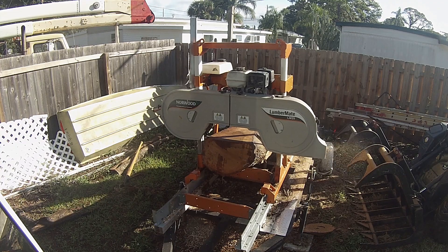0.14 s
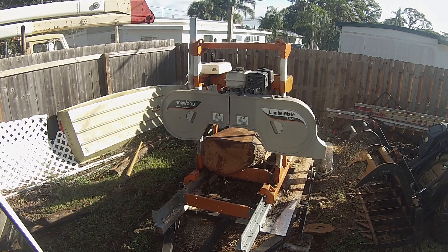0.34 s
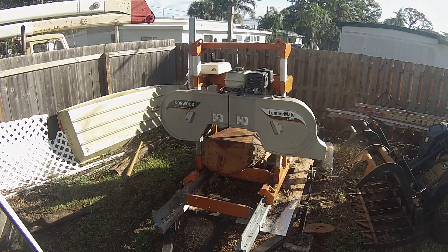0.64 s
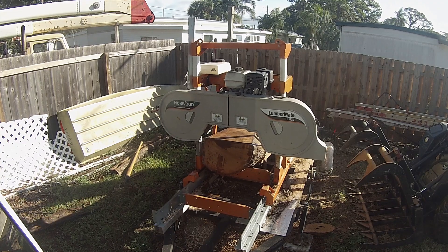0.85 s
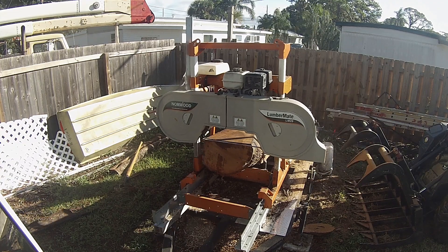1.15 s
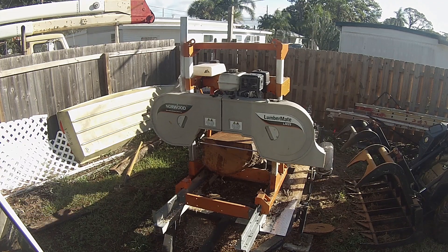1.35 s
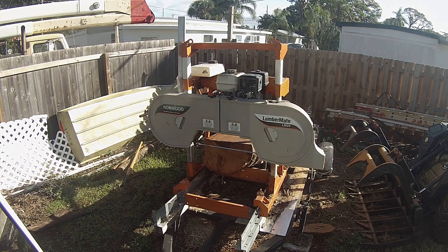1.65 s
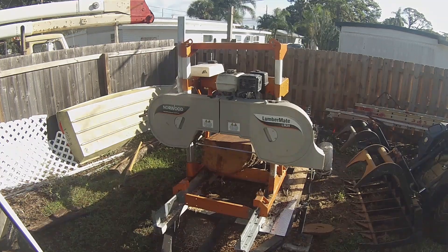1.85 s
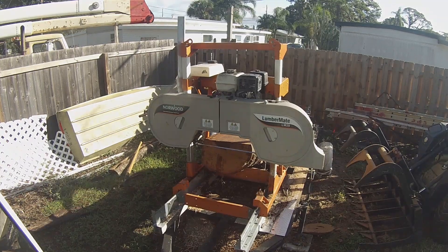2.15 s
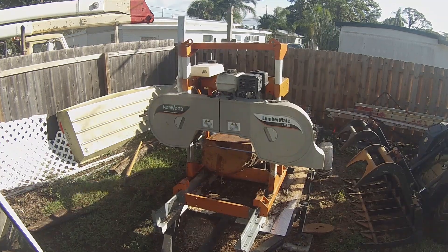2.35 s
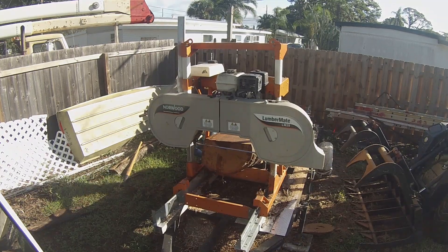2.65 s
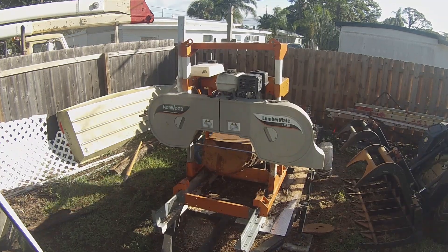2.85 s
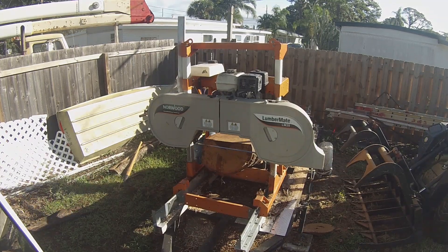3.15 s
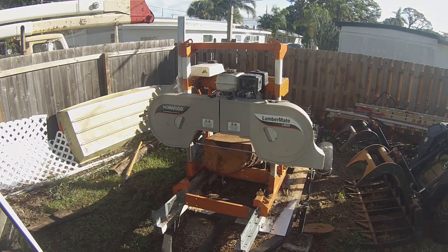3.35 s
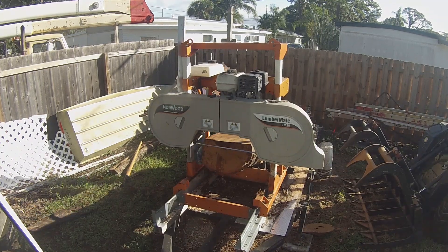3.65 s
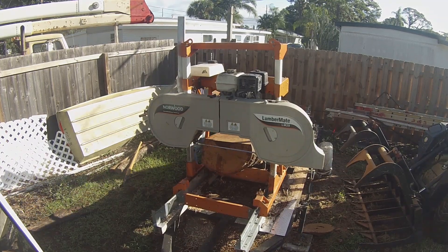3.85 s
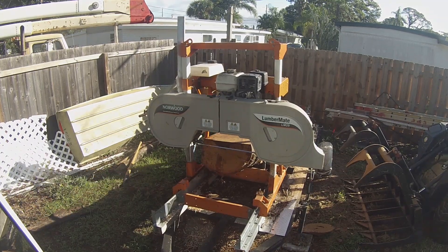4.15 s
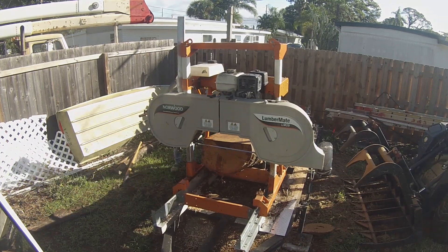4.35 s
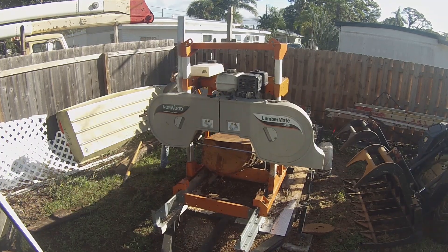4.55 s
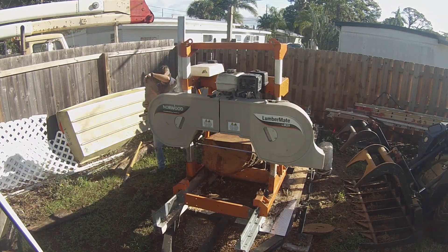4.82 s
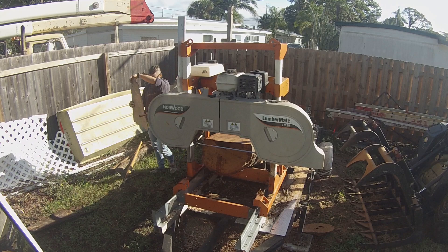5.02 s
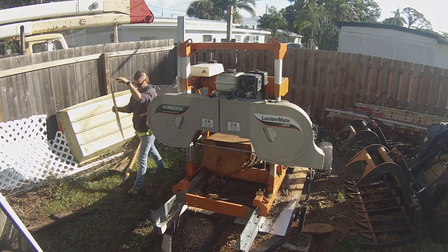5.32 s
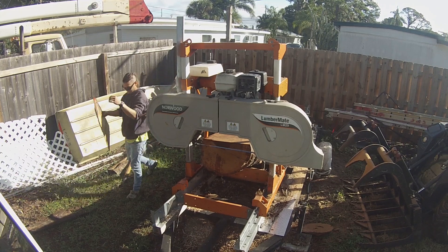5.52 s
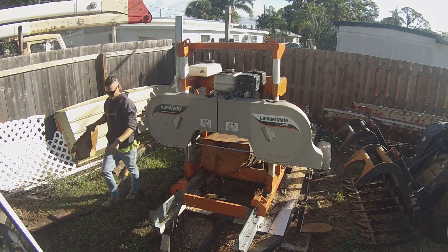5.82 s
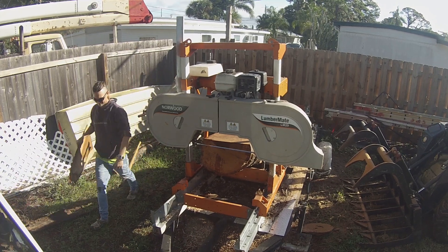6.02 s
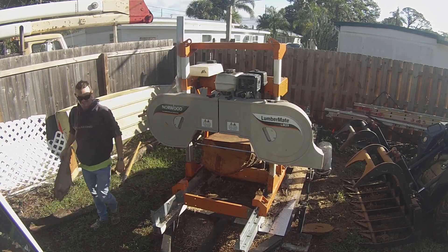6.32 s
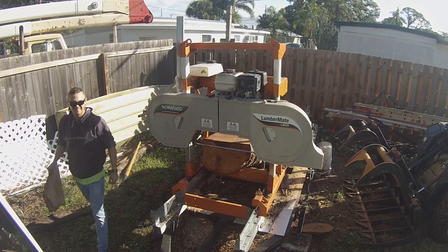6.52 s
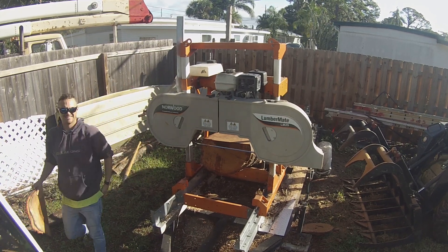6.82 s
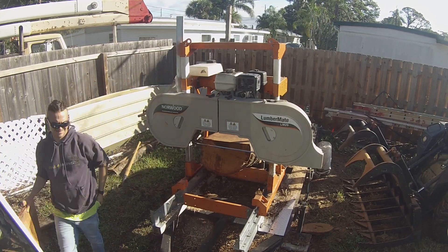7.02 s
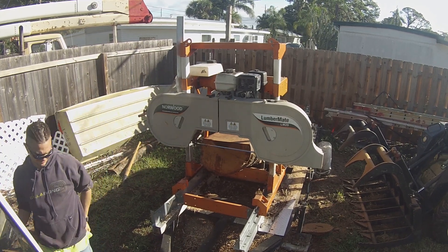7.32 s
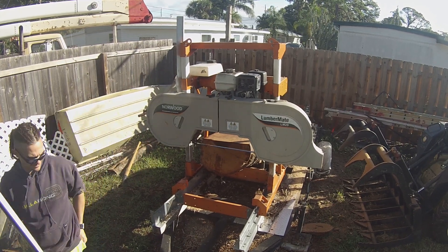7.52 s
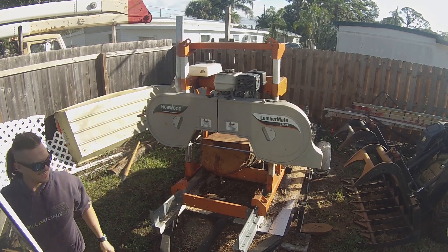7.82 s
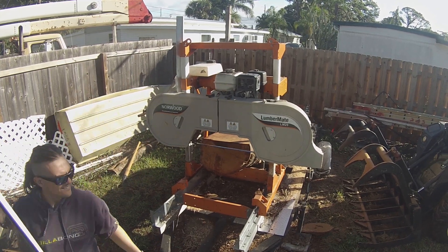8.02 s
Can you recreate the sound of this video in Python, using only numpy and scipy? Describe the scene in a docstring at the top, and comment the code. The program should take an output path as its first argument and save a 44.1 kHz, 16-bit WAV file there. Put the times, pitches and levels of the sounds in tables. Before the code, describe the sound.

A distant-sounding roar and blade hiss wind down, then at once a close small engine idles, chugging and ticking, while wind buffets the microphone.

```python
"""A single-cylinder four-stroke petrol engine drives a portable band sawmill in a fenced yard.
At first it is faint, at full throttle: crank hum, a rough roar and the hiss of the blade, until the throttle closes.
Then, abruptly, it is loud and idling: tones locked to the firing rate make exhaust thuds and singing guards;
shaped noise makes the roar of the guards, ringing covers, fan air, valve ticks, a buzz and the blade's swish.
Puffs of wind buffet the microphone as low, lumpy noise."""
import sys
import numpy as np
from scipy import signal
from scipy.fft import rfft, irfft, next_fast_len
from scipy.io import wavfile

SR = 44100
rng = np.random.default_rng(int(sys.argv[2]) if len(sys.argv) > 2 else 0)


def unload_audio(sound):
    """Save the sound as a 16-bit wav file, at the path given as the first command line argument."""
    columns = np.transpose(np.atleast_2d(sound))
    # keep every value between -1 and 1, then stretch to whole-number steps
    steps = np.round(np.clip(columns, -1, 1) * 32767)
    wavfile.write(sys.argv[1], SR, steps.astype(np.int16))


N = 360285
TIME = np.arange(N) / SR  # seconds

# crank hum under load: [firing_multiple, level_db]
HUM_ORDERS = [(1, -15), (2, -1), (4, -13), (5, 0), (6, 0), (8, -8), (11, -1.5), (12, -6), (20, -4.5)]
# broad colour of the roar under load: [pitch_hz, level_db]
ROAR_COLOUR = [(25, -11), (100, -10.5), (170, -5), (340, -2.5), (425, -7), (560, -4.5), (850, -9),
               (1300, -10), (1700, -19), (2400, -29), (5000, -50)]
# resonances that stand out of the roar: [pitch_hz, width_hz, boost_db]
ROAR_MODES = [(326, 20, 4), (588, 22, 8), (720, 60, 3), (1170, 50, 5), (2070, 70, 5)]
# colour of the blade's hiss in the cut: [pitch_hz, level_db]
HISS_COLOUR = [(1500, 3.5), (2650, -5), (3100, 3.5), (3800, 1), (5000, -9), (5650, -7.5), (6800, 1),
               (7600, -7), (9000, -2), (10400, -0.5), (12000, -12), (14000, -7), (15300, -18)]
# level of that hiss: [time_s, level_db]
HISS_LEVEL = [(0, -57), (.25, -59.5), (.8, -57), (1.15, -60.5), (1.5, -62.5)]
# idle speed: [time_s, firings_per_s]
IDLE_SPEED = [(1.84, 18.17), (2.41, 18.215), (3.06, 18.085), (4.02, 18.244), (4.67, 18.009), (5.2, 18.153),
              (6.02, 18.023), (7.42, 18.114), (8.17, 17.895)]
# exhaust tones, thud below and bark above: [firing_multiple, level_db_rms]
EXHAUST_TONES = [(1, -65.2), (2, -49.6), (3, -44.7), (4, -48.6), (5, -44), (6, -47.1), (7, -36.8),
                 (8, -33.1), (9, -34.5), (10, -35.5), (11, -39.8), (12, -49.0), (13, -35.8), (14, -42.0),
                 (15, -41.6), (16, -43.0), (17, -36.1), (18, -35.5), (19, -40.3), (20, -36.9)]
# gain on the muffler's bark: [time_s, gain_db]
BARK_LEVEL = [(1.85, 1), (2.35, 3.5), (3.1, -1.5), (3.6, 2.5), (5.9, 0.5), (6.5, 2), (6.9, 1.5),
              (8.17, 1.5)]
# broad colour of muffler and guards: [pitch_hz, level_db]
GUARD_COLOUR = [(40, -24), (130, -3.5), (290, -3.5), (395, -7.5), (480, -5.5), (720, -4), (920, -6.5),
                (1250, -4.5), (1480, -6.5), (1620, -15), (2400, -24.5), (3000, -23.5), (6000, -36.5)]
# resonances of muffler and guards: [pitch_hz, width_hz, boost_db]
GUARD_MODES = [(225, 25, 1), (327, 12, 5), (358, 12, 5), (450, 18, 3), (552, 24, 5), (590, 22, 5),
               (636, 14, 3), (692, 30, 4), (740, 24, 5), (822, 16, 5), (1037, 14, 9), (1144, 18, 6),
               (1175, 16, 5), (1300, 25, 3), (1490, 20, 3)]
# tones that the guards pick out of the firing rate: [firing_multiple, level_db_rms before TONES_DB]
PANEL_TONES = [(24, -48), (25, -44), (26, -52), (28, -51), (29, -51), (30, -39.5), (31, -39), (32, -37.5),
               (33, -47), (35, -48), (37, -48), (38, -47), (39, -45), (40, -47), (41, -43), (43, -49),
               (44, -51), (46, -50), (57, -45), (60, -52), (63, -44), (65, -47), (68, -48), (73, -52),
               (79, -52), (82, -52)]
# ring of the thin sheet-metal covers: [pitch_hz, width_hz, level_db]
COVER_RING = [(1814, 17, -3), (2032, 27, 3), (2112, 21, 5.5), (2244, 16, -6), (2465, 9, -3)]
# broad colour of the cooling fan and its shroud: [pitch_hz, level_db]
FAN_COLOUR = [(1500, -4), (2650, -13.5), (3000, -1), (3500, -2.5), (3750, -5.5), (4500, -9), (5100, -14.5),
              (5600, -31), (6500, -6.5), (7650, -11.5), (8400, -12.5), (11300, -9), (11900, -57),
              (15300, -49)]
# resonances of the fan shroud: [pitch_hz, width_hz, boost_db]
SHROUD_MODES = [(3186, 140, 5.8), (3454, 34, 10.3), (3620, 62, 1.4), (3920, 32, 10)]
# valve contacts, also the rattle in the shroud: [moment_cycle_share, level_db]
VALVE_TICKS = [(0.219, 6), (0.493, 6), (.75, 7.5), (0.958, -11)]
# ring of the valve gear: [pitch_hz, width_hz, level_db]
VALVE_MODES = [(3300, 400, -6), (6800, 600, -10), (8770, 50, -5), (9035, 130, 1), (9200, 160, -3),
               (9360, 220, -2), (9800, 500, -13), (10115, 45, 4), (10240, 70, -5), (10480, 200, -1),
               (10700, 160, -4), (11050, 250, -6), (11280, 130, -7)]
# treble slope of the valve gear: [pitch_hz, level_db]
VALVE_TREBLE = [(11300, 0), (11800, -7.5), (15000, -7)]
# lulls in which the clatter eases: [middle_s, depth_db, half_length_s]
CLATTER_LULLS = [(1.86, 2.3, .12), (2.86, 5.1, 0.051), (3.67, 5.5, .1), (4.0, 3.7, 0.12), (4.3, 5.3, 0.16),
                 (6.62, 3.5, 0.1)]
# knocks on the loose part: [moment_cycle_share, level_db]
BUZZ_KNOCKS = [(.02, -2), (.26, -1), (.51, 0), (.76, 0)]
# ring of the loose part: [pitch_hz, width_hz, level_db]
BUZZ_MODES = [(6165, 50, 0), (6290, 110, -3)]
# colour of the coasting blade's swish: [pitch_hz, level_db]
SWISH_SPECTRUM = [(3000, -30), (9000, -1), (12000, -12), (13200, 6), (14200, -2), (15300, -11)]
# puffs of wind on the microphone: [middle_s, peak_db, half_length_s]
WIND_PUFFS = [(2.1, -38, .12), (2.358, -27.5, 0.062), (3.34, -38, .08), (4.23, -22, 0.02),
              (4.446, -26.5, .06), (4.634, -31, .07), (5.282, -30, 0.084), (5.486, -22, 0.082),
              (7.05, -28.5, 0.27), (7.88, -24.5, 0.3)]
# colour of the wind: [pitch_hz, level_db]
WIND_COLOUR = [(10, -15), (24, 0), (48, -1), (90, -6.5), (180, -14.5), (400, -33), (1000, -60)]

# full throttle: firing rate, the moment the throttle closes, and the slowing after it
SAW_RATE_HZ, THROTTLE_OFF_S, SLOWING_HZ_PER_S = 29.35, 1.12, 4.1
# levels under load, and how fast they fall once the throttle closes
ROAR_DB, ROAR_FALL_DB_PER_S = -48, 6.5
HUM_DB, HUM_FALL_DB_PER_S = -50.5, 55
# start of the loud idle, and the moment its firing cycle starts from
LOUD_FROM_S, FIRST_THUD_S = 1.838, 1.8518
# thud and bark: lag after the firing (share of a cycle), and smear by echoes from the fence (radians)
THUD_LAG, THUD_SMEAR = .008, .42
BARK_LAG, BARK_SMEAR = .08, 1.2
# levels as the idle begins, and how fast they creep up
GUARD_DB, GUARD_RISE_DB_PER_S = -26.5, 0.1043
FAN_DB, FAN_RISE_DB_PER_S = -34.5, 0.25
SHEET_DB, SHEET_RISE_DB_PER_S = -49, 1.2
# gain on the panel tones; level of the buzz, of the clatter outside its lulls, and of the light breeze
TONES_DB, BUZZ_DB, CLATTER_DB, BREEZE_DB = 1.0, -41.5, -33.5, -49
# the coasting blade: one lap, first brush of its guides, starting level of the swish and its fading
LAP_S, FIRST_BRUSH_S, SWISH_DB, SWISH_FADE_DB_PER_S = 0.3285, 1.858, -46, 6
# swing of swish and clatter with each lap; the clatter's swing dies away over LAP_SETTLE_S
LAP_SWISH_DB, LAP_CLATTER_DB, LAP_SETTLE_S = 4.0, 1.5, 3.5
CUTOFF_HZ = 15400


def from_db(db):
    """Decibels to gain."""
    return 10 ** (np.asarray(db) / 20)


def rms_one(x):
    """Scale to unit rms."""
    return x / np.sqrt(np.mean(x ** 2) + 1e-20)


def in_time(rows):
    """Read the second column of a timed curve at every sample."""
    time_s, value = np.transpose(rows)
    return np.interp(TIME, time_s, value)


def white():
    """Fresh white noise."""
    return rng.standard_normal(N)


def drift(rate):
    """Smooth chance with unit rms, changing about rate times a second."""
    return rms_one(np.interp(TIME, np.arange(4096) / rate, rng.standard_normal(4096)))


def swell(at, half_length):
    """A smooth rise and fall around one moment; top 1."""
    return np.exp(-((TIME - at) / half_length) ** 2)


def colour(x, spectrum):
    """Give a sound a broad tone colour; unit rms."""
    hz, db = np.transpose(spectrum)
    size = next_fast_len(N + 8192)
    bins = np.fft.rfftfreq(size, 1 / SR) + 1e-3
    gain = from_db(np.interp(np.log(bins), np.log(hz), db))
    return rms_one(irfft(rfft(x, size) * gain, size)[:N])


def resonate(x, hz, width):
    """One damped resonance with about unit gain at its peak."""
    r = np.exp(-np.pi * width / SR)
    top = np.array([1, 0, -1]) * (1 - r * r) / 2
    bottom = [1, -2 * r * np.cos(2 * np.pi * hz / SR), r * r]
    return signal.lfilter(top, bottom, x + 1e-18)


def ring(x, modes):
    """Only the resonances sound; unit rms."""
    return rms_one(sum(from_db(db) * resonate(x, hz, width) for hz, width, db in modes))


def boost(x, modes):
    """The resonances stand out of the sound that passes; unit rms."""
    for hz, width, db in modes:
        x = x + (from_db(db) - 1) * resonate(x, hz, width)
    return rms_one(x)


def after_firing(cycle, delay, decay):
    """A swell after each firing that rises fast and dies away; delay and decay are shares of a cycle."""
    age = (cycle - delay) % 1 / decay
    return age * np.exp(1 - age)


def repeating(cycle, first, count):
    """Vibration that comes back alike in every cycle, smeared by echoes from the fence."""
    grid = np.linspace(0, 1, 2049)
    orders = np.arange(first, count)[:, None]
    shape = np.cos(2 * np.pi * (orders * grid + rng.random(orders.shape))).sum(0)
    return rms_one(np.interp(cycle % 1, grid, shape))


def contacts(cycle, moments, scatter, spread_db, decay_s):
    """Metal parts meet at set moments of each cycle; every contact is a chatter that builds fast and dies."""
    hits, numbers = np.zeros(N), np.arange(-1, 120)
    for moment, db in moments:
        chance = rng.standard_normal((len(numbers), 2))
        when = numbers + moment + scatter * chance[:, 0]
        at = np.interp(when, cycle, np.arange(N)).astype(int)
        hits[at] = from_db(db + spread_db * np.clip(chance[:, 1], -2, 2))
    for seconds in (.0006, decay_s):
        hits = signal.lfilter([1], [1, -np.exp(-1 / (seconds * SR))], hits + 1e-18)
    return rms_one(white() * hits)


def crank_hum(cycle, waver_db=0.27):
    """The loaded crank hums at multiples of the firing rate; higher tones waver more."""
    hum = 0
    for k, db in HUM_ORDERS:
        gain = from_db(db + waver_db * k * drift(15.9))
        hum = hum + gain * np.cos(2 * np.pi * (k * cycle + rng.random()))
    return rms_one(hum)


def loaded_roar(cycle, load):
    """Noise swelling with each firing and a repeating vibration shake the machine's resonances."""
    shake = 0.22 * load * repeating(cycle, first=7, count=56) + white()
    shake = shake * (1 + 0.15 * after_firing(cycle, delay=0, decay=0.33))
    return boost(colour(shake * from_db(1.0 * drift(25.3)), ROAR_COLOUR), ROAR_MODES)


def blade_hiss():
    """The blade in the cut hisses as finely flickering noise."""
    return from_db(in_time(HISS_LEVEL)) * colour(white() * from_db(1.0 * drift(170)), HISS_COLOUR)


def sawing(hunting_hz=0.195):
    """Full throttle with a hunting speed; then the throttle closes, the engine slows and its tones fade."""
    closed_s = np.maximum(TIME - THROTTLE_OFF_S, 0)
    rate_hz = SAW_RATE_HZ + hunting_hz * drift(5) - SLOWING_HZ_PER_S * closed_s
    cycle = np.cumsum(rate_hz) / SR + .006 * drift(20)
    load = from_db(-HUM_FALL_DB_PER_S * closed_s)
    hum = from_db(HUM_DB) * load * crank_hum(cycle)
    roar = from_db(ROAR_DB - ROAR_FALL_DB_PER_S * closed_s) * loaded_roar(cycle, load)
    return hum + roar + blade_hiss()


def since_idle():
    """Seconds since the idle began."""
    return np.maximum(TIME - LOUD_FROM_S, 0)


def exhaust(cycle, uneven_db=0.1, bark_uneven_db=1.0):
    """One low thud a firing; the muffler answers milliseconds later with a higher, ringing bark."""
    bark_gain = from_db(in_time(BARK_LEVEL) + bark_uneven_db * drift(18))
    sound = 0
    for k, db in EXHAUST_TONES:
        if k > 12:
            lag, smear, gain = BARK_LAG, BARK_SMEAR, bark_gain
        else:
            lag, smear, gain = THUD_LAG, THUD_SMEAR, 1
        phase = 2 * np.pi * k * (cycle - lag) + smear * rng.standard_normal()
        sound = sound - np.sqrt(2) * from_db(db) * gain * np.cos(phase)
    return sound * from_db(uneven_db * drift(21))


def guards(cycle, puff=0.56, puff_uneven_db=5.0):
    """A short uneven puff at each firing, then muffler and guards shake in a rough, trailing roar."""
    gas = puff * after_firing(cycle, delay=-.02, decay=.07) * from_db(puff_uneven_db * drift(20))
    trail = .4 * after_firing(cycle, delay=.04, decay=.2) * from_db(2 * drift(18))
    shake = white() * (1 + trail + gas)
    return boost(colour(shake * from_db(0.92 * drift(90)), GUARD_COLOUR), GUARD_MODES)


def guard_tones(cycle, waver_db=2.5, wander=0.084):
    """The panels sing at multiples of the firing rate, each tone wavering by itself (wander in turns)."""
    tones = 0
    for k, db in PANEL_TONES:
        turn = k * cycle + rng.random() + wander * drift(10)
        tones = tones + np.sqrt(2) * from_db(db + waver_db * drift(14)) * np.cos(2 * np.pi * turn)
    return tones


def sheet_metal(cycle):
    """Noise keeps thin covers ringing, most strongly in mid-cycle."""
    return ring(white() * (1 + 0.25 * after_firing(cycle, delay=0.26, decay=0.25)), COVER_RING)


def fan(cycle, rattle=0.46):
    """Air flutters four times a crank turn in the shroud, with fine rattle at the valve moments."""
    air = white() * (1 + .2 * np.cos(16 * np.pi * cycle))  # two crank turns a cycle
    ticks = contacts(cycle, VALVE_TICKS, scatter=.02, spread_db=3.0, decay_s=.007)
    return boost(colour(air + rattle * ticks, FAN_COLOUR), SHROUD_MODES)


def valves(cycle, chatter_db=2.5):
    """Tappets and valve seats tick in every cycle, over a fine chatter."""
    ticks = contacts(cycle, VALVE_TICKS, scatter=.01, spread_db=2.5, decay_s=.007)
    chatter = rms_one(white() * from_db(chatter_db * drift(300)))
    return colour(ring(ticks + .9 * chatter, VALVE_MODES), VALVE_TREBLE)


def lap():
    """Swings between -1 and 1 with every lap of the blade."""
    return np.cos(2 * np.pi * (TIME - FIRST_BRUSH_S) / LAP_S)


def clatter_level():
    """Valve clatter in dB: steady but for lulls, with a pulse at each blade lap that dies away."""
    lulls = sum(depth_db * swell(s, half_length) for s, depth_db, half_length in CLATTER_LULLS)
    return CLATTER_DB - lulls + LAP_CLATTER_DB * lap() * swell(LOUD_FROM_S, LAP_SETTLE_S)


def buzz(cycle):
    """A loose part is knocked twice a crank turn and rings high."""
    return ring(contacts(cycle, BUZZ_KNOCKS, scatter=.03, spread_db=2.5, decay_s=.009), BUZZ_MODES)


def blade_swish():
    """A thin swish of noise returns with every lap and fades as the blade coasts."""
    level_db = SWISH_DB - SWISH_FADE_DB_PER_S * since_idle() + LAP_SWISH_DB * lap()
    return from_db(level_db) * colour(white(), SWISH_SPECTRUM)


def idling():
    """The engine ticks over; the crank's speed wavers slightly from stroke to stroke."""
    cycle = np.cumsum(in_time(IDLE_SPEED)) / SR
    cycle = cycle - np.interp(FIRST_THUD_S, TIME, cycle) + .002 * drift(25)
    age = since_idle()
    low = exhaust(cycle) + from_db(TONES_DB) * guard_tones(cycle)
    low = low + from_db(GUARD_DB + GUARD_RISE_DB_PER_S * age) * guards(cycle)
    middle = from_db(SHEET_DB + SHEET_RISE_DB_PER_S * age) * sheet_metal(cycle)
    middle = middle + from_db(FAN_DB + FAN_RISE_DB_PER_S * age) * fan(cycle)
    high = from_db(clatter_level()) * valves(cycle) + from_db(BUZZ_DB) * buzz(cycle) + blade_swish()
    return low + middle + high


def wind():
    """Lumpy low buffeting on the microphone: puffs over a light breeze."""
    puffs = sum(from_db(db) * swell(s, half_length) for s, db, half_length in WIND_PUFFS)
    return (from_db(BREEZE_DB) + puffs) * colour(white() * from_db(1.5 * drift(25)), WIND_COLOUR)


def scene():
    """The faint sawing gives way at once to the loud idle and the wind."""
    loud = np.clip((TIME - LOUD_FROM_S) / .001, 0, 1)  # a crossfade of one millisecond
    return ((1 - loud) * sawing() + loud * (idling() + wind()))[None]


def record(dry):
    """The top is cut steeply above CUTOFF_HZ."""
    return signal.sosfilt(signal.ellip(12, .1, 90, CUTOFF_HZ, fs=SR, output="sos"), dry)


dry = scene()
out = record(dry)
unload_audio(out)
```